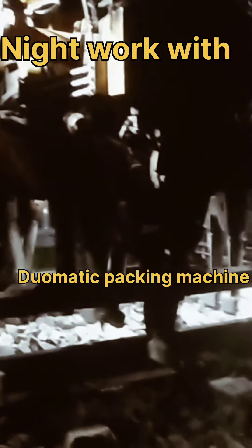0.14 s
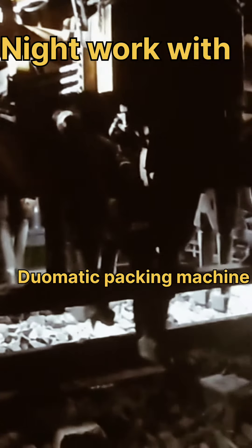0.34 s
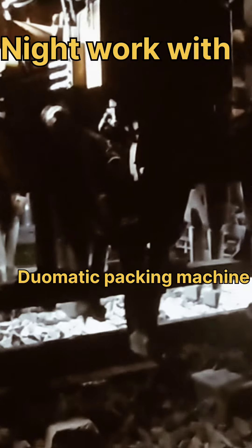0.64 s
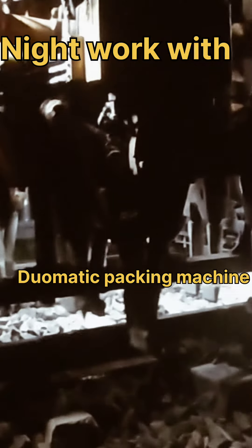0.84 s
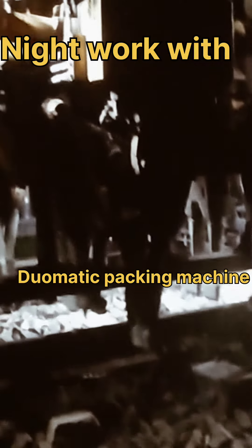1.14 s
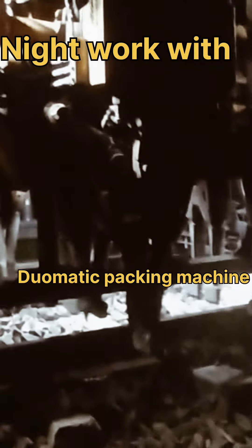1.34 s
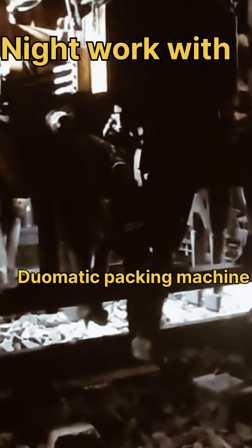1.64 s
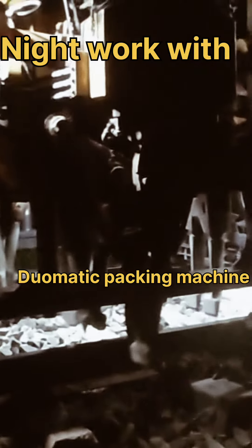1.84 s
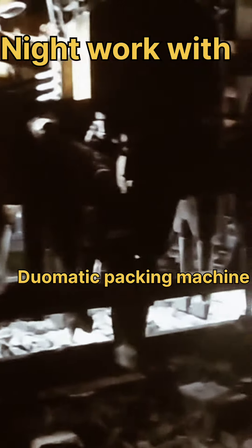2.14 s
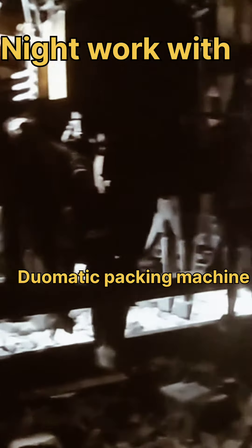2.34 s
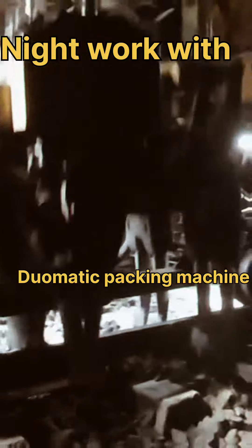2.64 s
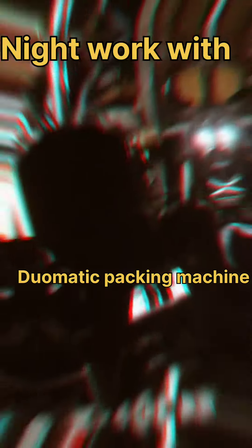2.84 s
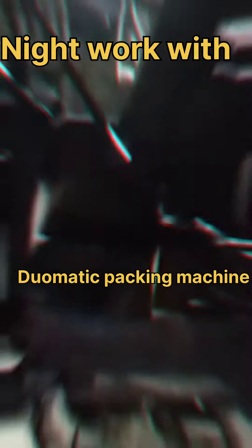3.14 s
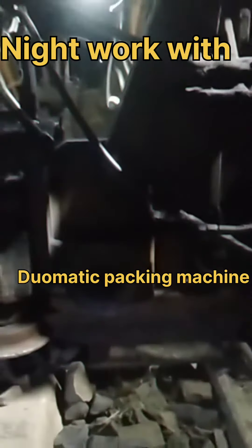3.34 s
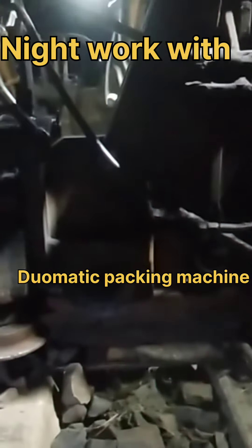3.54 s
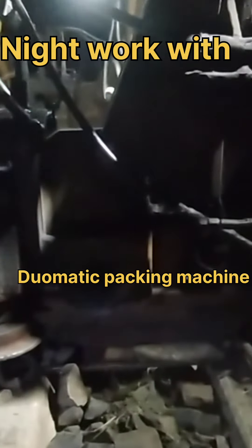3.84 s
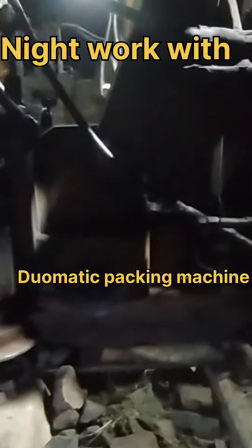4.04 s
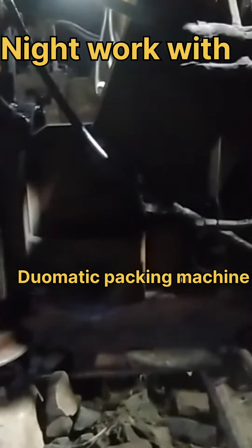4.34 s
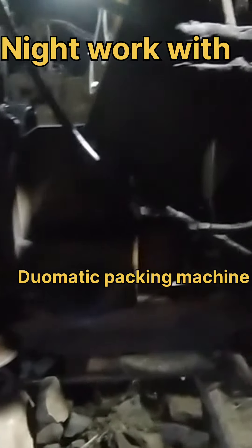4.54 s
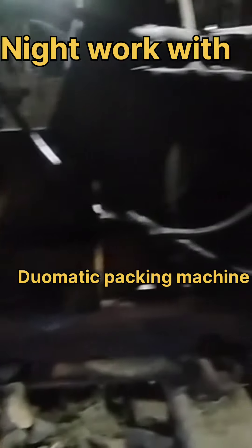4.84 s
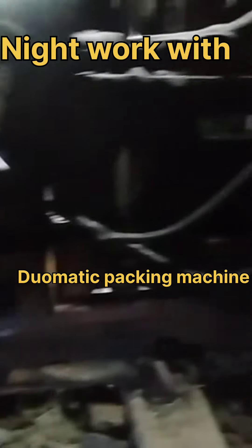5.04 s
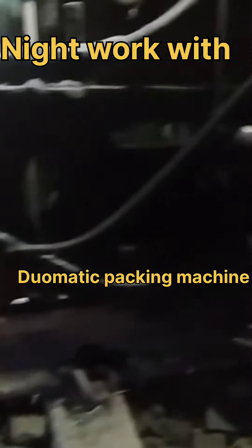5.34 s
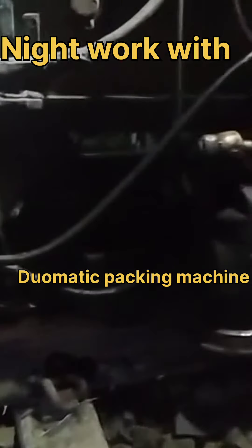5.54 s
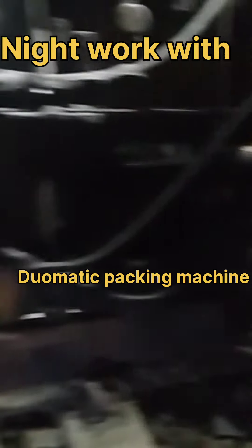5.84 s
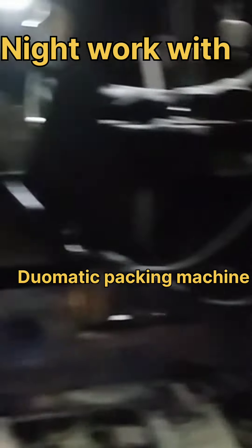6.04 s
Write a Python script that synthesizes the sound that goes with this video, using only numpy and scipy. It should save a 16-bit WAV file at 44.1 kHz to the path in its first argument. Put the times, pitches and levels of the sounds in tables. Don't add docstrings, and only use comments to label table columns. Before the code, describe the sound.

From 0 to 2.95 seconds, a fast diesel roars very close in the open, dense and loud, with shaking steel panels and a strong hydraulic drone around 275 hertz. The drone dips in pitch around 1.5 to 2 seconds, then climbs and weakens; the engine strains slightly and recovers. From about 2.6 seconds compressed air hisses in spurts, with a low puff at 2.8. Total silence lasts until 3.3. Abruptly a softer, darker idle begins: deep hum near 40 hertz slowly falling, hollow overtones, valve clatter strongest at first, a loose part knocking nearly seven times a second and faint bright belt chirps about thirteen times a second, mostly right. Around 5 seconds a second pump whine near 900 hertz cuts in with higher and lower tones; knocks get harder from 4.7. The whine sags after 5.4 and fades near 6, ending abruptly at 6.2. Wide phone stereo with patchy treble.

```python
import sys
import numpy as np
from scipy import signal
from scipy.fft import rfft, irfft, next_fast_len
from scipy.io import wavfile
from scipy.ndimage import uniform_filter1d

SR = 44100
rng = np.random.default_rng(int(sys.argv[2]) if len(sys.argv) > 2 else 0)


def field_ratio(decibels):
    return 10 ** (np.asarray(decibels, dtype=float) / 20)


def master(y):
    cut = np.clip(np.atleast_2d(y).T, -1, 1)
    pcm = np.round(cut * 32767)
    wavfile.write(sys.argv[1], SR, pcm.astype(np.int16))


N = 272979


def in_time(rows, t):
    s, *columns = np.transpose(rows)
    return [np.interp(t, s, c) for c in columns]


def at_hz(rows, hz):
    at, *columns = np.transpose(rows)
    return np.array([np.interp(np.log(hz), np.log(at), c) for c in columns])


def turning(hz):
    return 2 * np.pi * np.cumsum(hz) / SR


def drift(t, rate):
    r = np.exp(-80 * np.pi * rate / SR)
    noise = rng.standard_normal(len(t) // 40 + 2002)
    slow = signal.lfilter([1], [1, -2 * r, r * r], noise)[2000:]
    return np.interp(np.arange(len(t)) / 40, np.arange(len(slow)), slow / slow.std())


def tone(t, phase, db, wobble_db, pan_db, lead):
    shake = 0.059 * wobble_db * drift(t, 1.3)
    wave = phase + rng.uniform(0, 2 * np.pi) + shake + np.array([[lead], [0]])
    ears_db = np.array([[pan_db], [-pan_db]]) / 2
    return np.sqrt(2) * field_ratio(db + wobble_db * drift(t, 4.5) + ears_db) * np.sin(wave)


def field(size, alike, lag_ms):
    hz = np.maximum(np.fft.rfftfreq(size, 1 / SR), 1)
    mid, side = rfft(rng.standard_normal((2, size))) * np.sqrt(SR / 2)
    share = np.clip(at_hz(alike, hz)[0], 0, 1)
    ears = np.sqrt((1 + share) / 2) * mid + np.sqrt((1 - share) / 2) * side * [[1], [-1]]
    ears[0] *= np.exp(-2j * np.pi * hz * lag_ms / 1000)
    return hz, ears


def hump(hz, centre_hz, width_hz):
    return 1 / (1 + (2 * (hz - centre_hz) / width_hz) ** 2)


def ringing(t, centre_hz, width_hz, alike, lag_ms):
    size = next_fast_len(len(t))
    hz, ears = field(size, alike, lag_ms)
    out = irfft(ears * hump(hz, centre_hz, width_hz), size)[:, :len(t)]
    return out / out.std()


def beats(t, first_s, every_s, level_db, length_s, spread_db, spread_s):
    s = np.arange(first_s, t[-1], every_s)
    chance = rng.standard_normal((len(s), 2))
    times, levels_db = s + spread_s * chance[:, 0], level_db(s) + spread_db * chance[:, 1]
    out = 0
    for at, db in zip(times, levels_db):
        out = out + field_ratio(db) * np.exp(-((t - at) / length_s) ** 2)
    return out


def roar(t, ears_db, humps, alike, load, shares, load_hz, turn, lag_ms, patchy_db, throb_db, pulse_db):
    size = next_fast_len(len(t))
    hz, ears = field(size, alike, lag_ms)
    colour_db = at_hz(ears_db, hz)
    for centre_hz, width_hz, *db in humps:
        colour_db = colour_db + np.outer(db, hump(hz, centre_hz, width_hz))
    ears = ears * field_ratio(colour_db)
    swing = np.outer(shares, in_time(load, t)[0])
    firing = np.cos(6 * turn)
    place = 2 * np.log2(hz / 25)
    load_place = 2 * np.log2(np.array(load_hz) / 25)
    out = 0
    for k in range(20):
        window = np.cos(np.pi / 2 * np.clip(place - k, -1, 1)) ** 2
        band = irfft(ears * window, size)[:, :len(t)]
        where = np.interp(k, load_place, [0, 1, 2])
        load_db = sum(max(1 - abs(where - j), 0) * swing[j] for j in range(3))
        beat_db = throb_db * where / 2 * np.cos(turn) + pulse_db * firing
        out = out + band * field_ratio(load_db + patchy_db * drift(t, 16) + beat_db)
    return out


# (time [s], firing rate [Hz])
WORKING_SPEED = [
    (0, 108),
    (.5, 105.3),
    (1.1, 104.7),
    (1.9, 103.8),
    (2.2, 106.3),
    (2.94, 105),
]


def working_engine(t, firing_hz):
    FREE_HZ, STRAIN_DB_PER_HZ = 105.9, 4.5
    firing = turning(firing_hz)
    second_db = -33.5 + STRAIN_DB_PER_HZ * np.maximum(FREE_HZ - firing_hz, 0)
    return tone(t, firing, -34, 0.91, 0.1, 0.) + tone(t, 2 * firing, second_db, 2.1, 0.1, 0.)


# (time [s], piston rate [Hz], level [dB])
PUMP = [(0.0, 278.6, -19.5), (0.55, 278.4, -19), (0.94, 280.2, -20.5), (1.45, 271, -22.5),
        (1.65, 268, -23.5), (2.0, 268.6, -26.5), (2.1, 270.2, -21.5), (2.25, 271.8, -25.5),
        (2.52, 274.7, -20), (2.74, 278.5, -24.5), (2.94, 284, -31.5)]


def working_pump(t):
    FREE_HZ, OCTAVE_DB_PER_HZ = 279, .7
    pump_hz, pump_db = in_time(PUMP, t)
    pump = turning(pump_hz)
    octave_db = -35 + OCTAVE_DB_PER_HZ * (FREE_HZ - pump_hz)
    return tone(t, pump, pump_db, 1.0, 0.803, 0.) + tone(t, 2 * pump, octave_db, 1.7, -1.5, -.1)


# (frequency [Hz], likeness [0-1])
NEAR_ALIKE = [(60, 1), (290, 0.81), (640, 0.91), (1400, 0.3), (3000, 0.2), (7000, .05)]
# (time [s], jet level [dB])
LEAK = [
    (2.45, -52),
    (2.59, -54),
    (2.612, -35),
    (2.65, -43),
    (2.79, -41.5),
    (2.85, -34),
    (2.95, -34),
]


def air_leak(t):
    jet = field_ratio(in_time(LEAK, t)[0]) * np.clip((t - 2.45) / .1, 0, 1)
    whistle = field_ratio(15 + np.array([[-8.], [0]]))
    out = field_ratio(3.0) * ringing(t, 11500, 9000, NEAR_ALIKE, 0)
    out += field_ratio(12.5) * ringing(t, 5500, 2500, NEAR_ALIKE, 0)
    out += whistle * ringing(t, 9000, 3000, NEAR_ALIKE, 0)
    return jet * out


# (frequency [Hz], left [dB per Hz], right [dB per Hz])
NEAR_ROAR = [(30, -57.5, -54.5), (70, -57, -62), (135.6, -53.5, -56), (184, -48.5, -46), (372, -48, -47.5),
             (620, -49.5, -49.5), (730, -49.5, -47.5), (1850, -54.5, -52), (4150, -55.5, -56.5),
             (7030, -55.5, -63), (8000, -61.5, -60.5), (10500, -74, -61), (11400, -77.5, -70.5),
             (15000, -81.5, -79)]
# (frequency [Hz], width [Hz], left [dB], right [dB])
NEAR_HUMPS = [(518.5, 30, 4.5, 7.5), (445, 25, 2, 7), (607, 56, 2, 4.5), (632, 54, 6, 3.5), (996, 36, 2, 9),
              (1052, 57, 7, 6), (1135, 36, 3.5, 0.5), (1212, 81, 5.5, 4), (1490, 110, 0, 5.5),
              (2945, 880, 10, 0), (9360, 1200, -2.5, 4.5)]
# (time [s], level [dB])
NEAR_LOAD = [
    (0.05, 1),
    (0.35, 1),
    (0.6, -0.5),
    (0.9, -0.5),
    (1.3, 1),
    (1.75, 0.1),
    (2.1, 1.7),
    (2.4, 0.5),
    (2.75, 0.5),
    (2.9, -1),
]
# (body, rattle, hiss) [dB per dB]
NEAR_SHARES = (1.3, 0.06, 0.27)


def working_roar(t, firing):
    return roar(t, NEAR_ROAR, NEAR_HUMPS, NEAR_ALIKE, NEAR_LOAD, NEAR_SHARES, (700, 3500, 9000),
                firing / 6, lag_ms=0.053, patchy_db=0.69, throb_db=0.44, pulse_db=0.21)


def gust(t):
    AT_S, LENGTH_S, LEVEL_DB = 2.78, .09, -29.5
    puff = np.exp(-((t - AT_S) / LENGTH_S) ** 2)
    return field_ratio(LEVEL_DB) * puff * ringing(t, 32, 25, NEAR_ALIKE, 0)


def working_stand(t):
    firing_hz, = in_time(WORKING_SPEED, t)
    out = working_engine(t, firing_hz) + working_pump(t) + air_leak(t)
    return out + working_roar(t, turning(firing_hz)) + gust(t)


# (time [s], firing rate [Hz])
IDLE_SPEED = [(3.3, 42.6), (3.7, 41.9), (4.1, 40.8), (4.5, 40.3), (4.9, 39.9), (5.25, 39.1), (5.6, 38.5),
              (6.19, 38.3)]
# (engine order, frequency [Hz], width [Hz], top level [dB])
PIPES = [
    (2, 76, 12, -39),
    (4, 162, 13, -28),
    (5, 199, 40, -33.5),
    (10, 406, 34, -31.5),
]


def exhaust(t, firing_hz):
    firing = turning(firing_hz)
    out = tone(t, firing, -17.5, .25, .8, 0.)
    for order, centre_hz, width_hz, db in PIPES:
        order = round(order)
        swell = hump(order * firing_hz, centre_hz, width_hz)
        out += swell * tone(t, order * firing, db, 1.4, .4, .012 * order)
    return out


# (frequency [Hz], likeness [0-1])
IDLE_ALIKE = [(60, 0.79), (290, 1), (640, 1), (1400, 0.35), (3000, 0.14), (7000, .05)]
# (time [s], low cover level [dB], high cover level [dB])
CLATTER = [(3.34, -25.5, -30.5), (3.52, -24, -36), (3.95, -26, -38), (4.15, -28.5, -38), (4.48, -28.5, -36),
           (4.7, -30.5, -39), (5.15, -29, -40), (5.4, -27.5, -32), (5.75, -29, -36.5), (6.16, -34, -39)]
# (lower [Hz], upper [Hz])
HIGH_COVER_HZ = (3690, 3786)


def valve_clatter(t, firing):
    FITFUL_DB, FITS_PER_S = 1.6, 9
    low_db, high_db = in_time(CLATTER, t)
    beat = field_ratio(2.1 * np.cos(firing))
    low = beat * field_ratio(low_db - 2.5) * ringing(t, 894, 300, IDLE_ALIKE, -0.085)
    turned = np.pi / 2 * (t - t[0]) / (t[-1] - t[0])
    lower_hz, upper_hz = HIGH_COVER_HZ
    covers = np.cos(turned) * ringing(t, lower_hz, 260, IDLE_ALIKE, -.28)
    covers += np.sin(turned) * ringing(t, upper_hz, 260, IDLE_ALIKE, -.28)
    high = field_ratio(high_db + np.array([[-.8], [-5.5]])) * field_ratio(2.0 * np.cos(firing / 6 + 2.1))
    return low + high * covers * field_ratio(FITFUL_DB * drift(t, FITS_PER_S))


def loose_part(t):
    KNOCK_DB, SHAKEN_DB = -34, 6.5
    rattle = beats(t, 3.339, .1492, lambda s: KNOCK_DB + SHAKEN_DB * (s > 4.7) * (s < 5.95),
                   length_s=0.052, spread_db=-1.5, spread_s=0)
    plates = ringing(t, 1012, 200, IDLE_ALIKE, -0.19) + field_ratio(-2) * ringing(t, 620, 170, IDLE_ALIKE, -0.19)
    boom = beats(t, 4.61, .297, lambda s: -32, length_s=0.097, spread_db=1.2, spread_s=.015)
    return rattle * plates + boom * ringing(t, 700, 25, IDLE_ALIKE, -0.085)


def belt(t):
    CHIRP_DB, GRIP_DB, GRIP_S = -31.5, -2, 3.78
    slip = beats(t, 3.3685, .0741, lambda s: CHIRP_DB + GRIP_DB * (s < GRIP_S),
                 length_s=0.015, spread_db=0, spread_s=.004)
    return slip * field_ratio(np.array([[-14.], [-4.]])) * ringing(t, 8450, 170, IDLE_ALIKE, 0)


# (half order [dB], second order [dB], third order [dB])
LATE_ORDERS_DB = (-36, -31, -36)


def late_pump(t):
    PUMP_HZ, SAG_S, SAG_HZ_PER_S = 451.5, 5.4, 5
    CUT_IN_S, SPIN_UP_S, THIRD_LATE_S = 5.0, .15, .17
    UNLOADS_S, UNLOAD_DB_PER_S = 5.9, 27
    pump = turning(PUMP_HZ - SAG_HZ_PER_S * np.maximum(t - SAG_S, 0))
    half_db, second_db, third_db = LATE_ORDERS_DB
    up = np.clip((t - CUT_IN_S) / SPIN_UP_S, 0, 1)
    third_up = np.clip((t - CUT_IN_S - THIRD_LATE_S) / SPIN_UP_S, 0, 1)
    fading_db = second_db - UNLOAD_DB_PER_S * np.maximum(t - UNLOADS_S, 0)
    out = up * tone(t, 2 * pump, fading_db, 1.1, .3, .8)
    out += third_up * tone(t, 3 * pump, third_db, 1.2, -1.5, 1.92)
    return out + third_up * tone(t, 0.54 * pump, half_db, 2.2, .2, .05)


# (frequency [Hz], left [dB per Hz], right [dB per Hz])
IDLE_ROAR = [(25.06, -52.5, -53), (60, -49, -51), (120, -63.5, -60), (190.5, -45.5, -48), (455, -53, -55.5),
             (1120, -58, -59), (2000, -61.5, -62.5), (3180, -61, -68.5), (4240, -68.5, -72.5),
             (6800, -69.5, -72), (8800, -71.5, -68), (9950, -88, -70), (11300, -92.5, -79.5),
             (14500, -122.1, -83.5)]
# (frequency [Hz], width [Hz], left [dB], right [dB])
IDLE_HUMPS = [(265, 33, -5.5, 2.2), (396, 60, -5.5, 2), (607, 200, 3.5, 0.67), (696, 30, 0.5, 6),
              (1647, 280, 6.5, 5.1), (5740, 900, 5, 2), (9600, 1200, -2.5, 2.7)]
# (time [s], level [dB])
IDLE_LOAD = [
    (3.4, 1.7),
    (3.65, -2.5),
    (3.9, -1.2),
    (4.15, -1.1),
    (4.4, 0.2),
    (4.85, -2.6),
    (5.15, -0.5),
    (5.4, -1.1),
    (6.15, -2),
]
# (body, rattle, hiss) [dB per dB]
IDLE_SHARES = (0.57, 0.33, .3)


def idling_roar(t, firing):
    return roar(t, IDLE_ROAR, IDLE_HUMPS, IDLE_ALIKE, IDLE_LOAD, IDLE_SHARES, (450, 2000, 6000),
                firing / 6, lag_ms=-0.26, patchy_db=0.77, throb_db=0.16, pulse_db=0.26)


def idling_stand(t):
    firing_hz, = in_time(IDLE_SPEED, t)
    firing = turning(firing_hz)
    out = exhaust(t, firing_hz) + valve_clatter(t, firing) + loose_part(t)
    return out + belt(t) + late_pump(t) + idling_roar(t, firing)


# (start [s], end [s])
CUT_S = (2.9535, 3.298)


def scene():
    t, out = np.arange(N) / SR, np.zeros((2, N))
    end, start = (round(s * SR) for s in CUT_S)
    out[:, :end] = working_stand(t[:end])
    fade_in = np.clip((t[start:] - t[start]) / 0.0048, 0, 1)
    out[:, start:] = idling_stand(t[start:]) * fade_in
    return out


# (frequency [Hz], near left [dB], near right [dB], idle left [dB], idle right [dB])
DROP = [(1960, -17.5, -14, -9.5, -6.5), (4040, -6.5, -2.5, -7.5, -4.5), (7040, 6.5, -2.5, -9, -1),
        (7730, -2.5, -2.5, -4, -1), (8760, 6, -8, -7, -7), (9600, -5, -8, 5, -9),
        (10480, 4, -1.5, -4, -4.2), (11800, -0.5, 1.5, -0.5, -3), (13650, 3, 3.5, 13, -2),
        (15500, -2.5, -2.5, 12.5, 10.5)]


def thinned(x):
    FRAME_START = 86
    window = np.sqrt(signal.get_window("hann", 2048))
    shifted = np.roll(x, -FRAME_START, axis=1)
    hz, s, bins = signal.stft(shifted, SR, window, 2048, 1024, scaling="psd")
    hz = np.maximum(hz, 1)
    margin = np.where(hz > DROP[0][0], at_hz(DROP, hz), -99)
    near = at_hz(NEAR_ROAR, hz) + margin[:2]
    idle = at_hz(IDLE_ROAR, hz) + margin[2:]
    floor_db = np.where(s < CUT_S[1] - .1, near[..., None], idle[..., None])
    lasting = uniform_filter1d(rng.standard_normal((129, len(s))), size=5, axis=1)
    waver_db = 3.2 * np.repeat(lasting / lasting.std(), 8, axis=0)[:len(hz)]
    power = uniform_filter1d(2 * abs(bins) ** 2, size=3, axis=1)
    kept = power > field_ratio(2 * (floor_db + waver_db))
    out = signal.istft(bins * kept, SR, window, 2048, 1024, scaling="psd")[1][:, :N]
    return np.roll(out, FRAME_START, axis=1)


def roll_off(x):
    return signal.sosfilt(signal.butter(12, 15680, fs=SR, output="sos"), x)


def record(dry):
    t = np.arange(N) / SR
    cut = thinned(dry) * ((t < CUT_S[0]) | (t > CUT_S[1]))
    return roll_off(np.clip(cut, -1, 1))


dry = scene()
out = record(dry)
master(out)
```